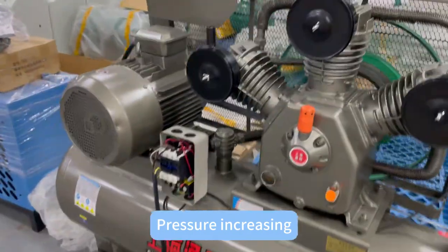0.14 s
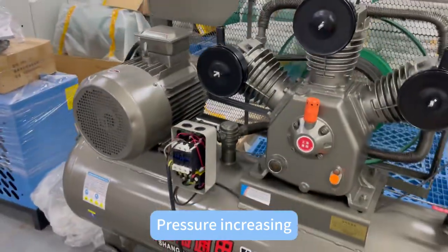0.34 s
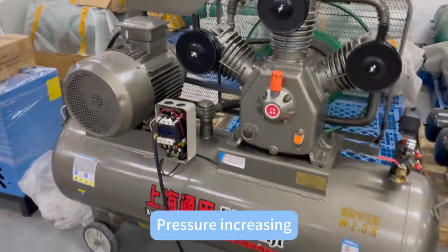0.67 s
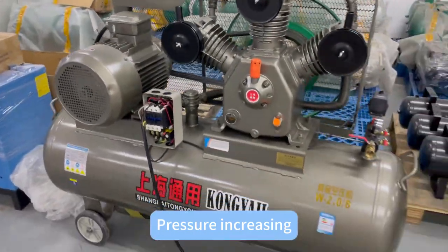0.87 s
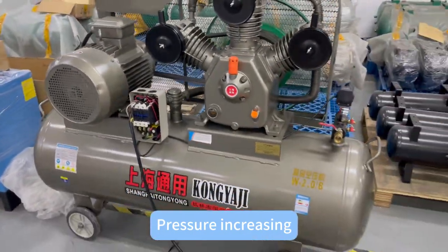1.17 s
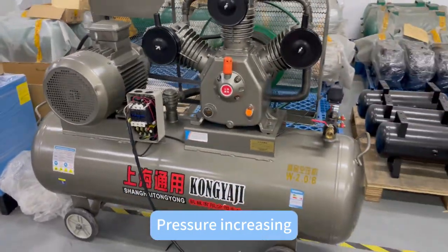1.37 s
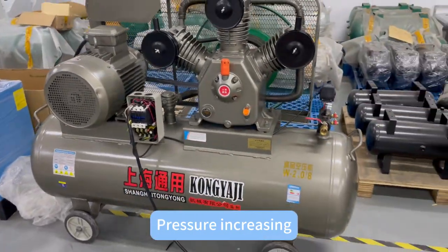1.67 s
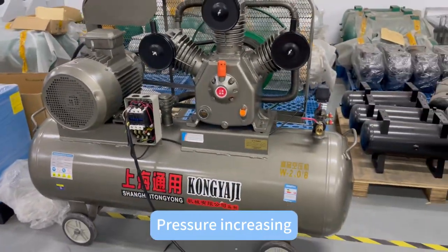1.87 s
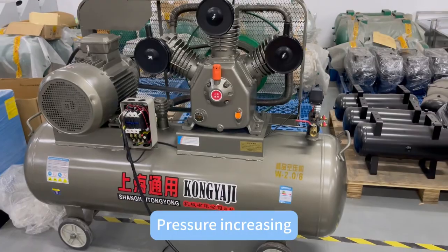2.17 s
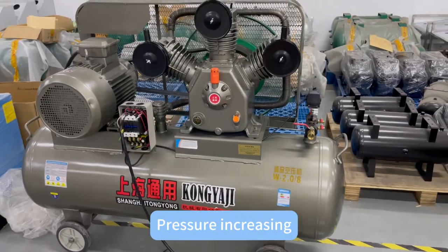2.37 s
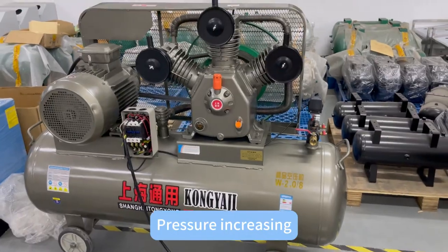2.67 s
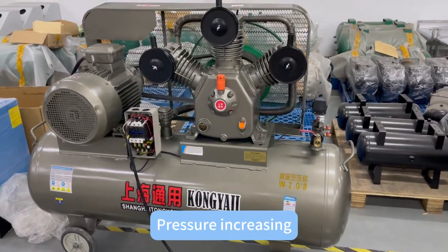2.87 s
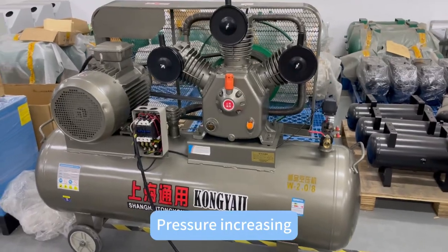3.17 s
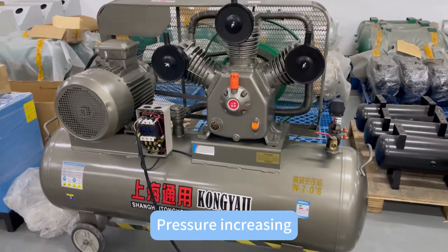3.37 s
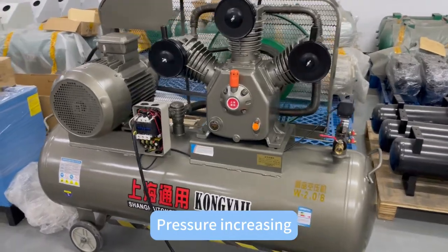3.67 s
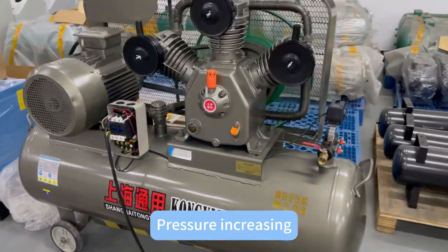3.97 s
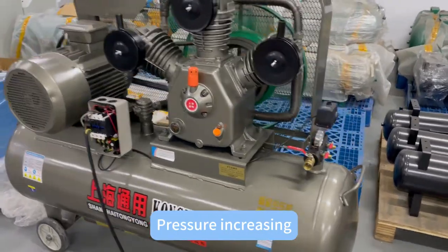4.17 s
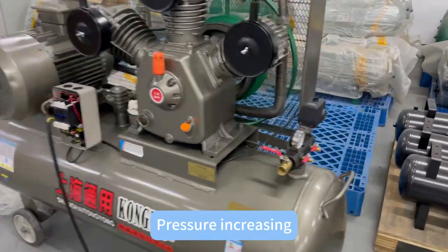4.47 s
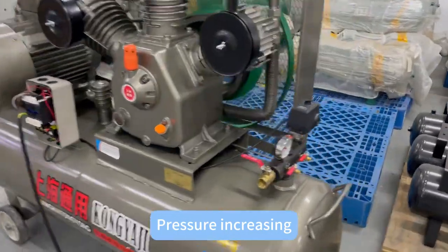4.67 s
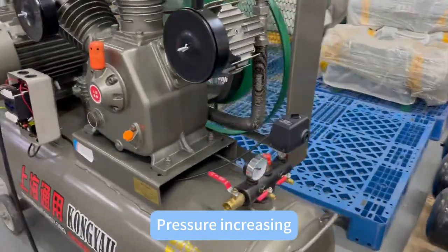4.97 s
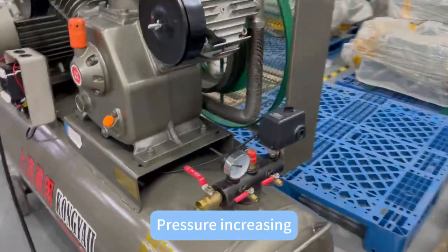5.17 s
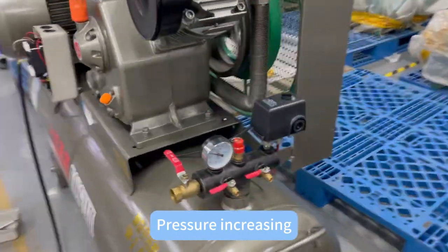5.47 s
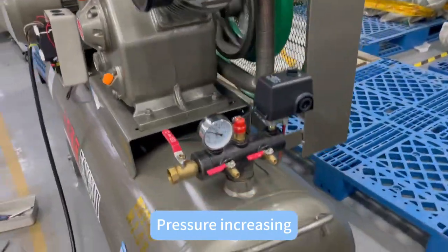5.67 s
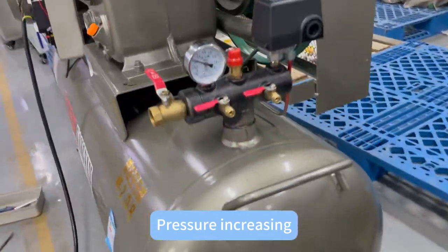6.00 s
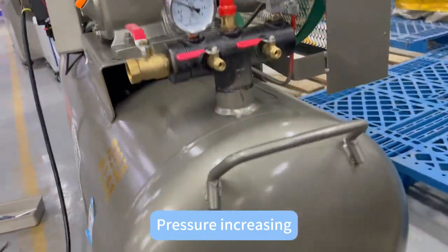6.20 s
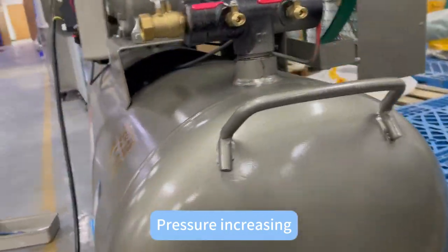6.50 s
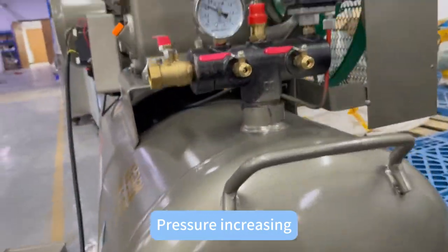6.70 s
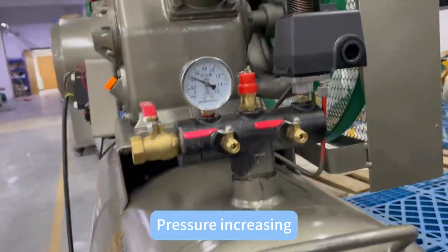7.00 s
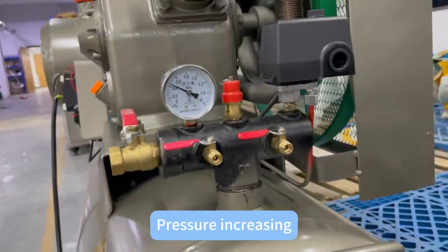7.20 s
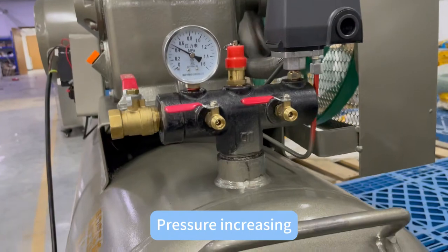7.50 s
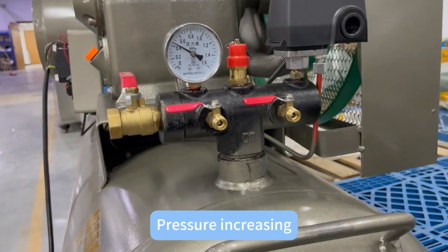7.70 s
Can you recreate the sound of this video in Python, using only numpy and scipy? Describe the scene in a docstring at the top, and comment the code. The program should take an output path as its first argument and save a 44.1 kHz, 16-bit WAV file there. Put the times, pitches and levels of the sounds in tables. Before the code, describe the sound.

A three-cylinder air compressor runs without pause in a warehouse, about thirteen low throbbing pulses a second, each turn repeating the same uneven pattern. Valve hiss puffs along, the metal frame rattles, thin whines waver and rumble lies beneath. A close stereo microphone backs off slightly, then walks round to the tank end; around four seconds low bursts of air and a soft thud hit it.

```python
"""A three-cylinder piston compressor pumps steadily in a warehouse, heard on a two-port microphone.
The listener backs off within a metre, then walks round from its front to its end.
Every crank turn repeats the same air pulses as decaying sines, the ringing of intakes, pipes and tank.
Valves puff as gated noise, the frame rattles as noise through resonances, a few sine whines come and go,
and low noise rumbles, as machine noise and as air moving on the microphone."""
import sys
import numpy as np
from scipy import signal
from scipy.fft import rfft, irfft, next_fast_len
from scipy.io import wavfile

SR = 44100
rng = np.random.default_rng(int(sys.argv[2]) if len(sys.argv) > 2 else 0)


def wav_out(sig):
    """Save sig, one row per channel (or a flat mono array), as 16-bit PCM at SR to the path in sys.argv[1]."""
    wavfile.write(sys.argv[1], SR, np.round(np.clip(np.atleast_2d(sig).T, -1, 1) * 32767).astype(np.int16))


N = 346185
RUN_IN = 12000  # samples played before the take and cut off, so that everything already sounds
TIME = np.arange(-RUN_IN, N) / SR  # s
CRANK_HZ = 12.85
SPEED_OF_SOUND = 343  # m/s


def from_db(db):
    """Decibels to amplitude gain."""
    return 10 ** (np.asarray(db) / 20)


def rms_one(x):
    """Scale to rms 1."""
    return x / np.sqrt(np.mean(x ** 2) + 1e-20)


def at_hz(points, hz):
    """Read a (hz, value) curve on a log-frequency axis."""
    points = np.array([p for p in points if p[0] > 0])
    return np.interp(np.log(hz + 1), np.log(points[:, 0]), points[:, 1])


def drift(rate):
    """Slow random wander: normal draws, two per 1 / rate seconds, joined by straight lines."""
    knots = np.arange(TIME[0], TIME[-1] + 1, .5 / rate)
    return np.interp(TIME, knots, rng.standard_normal(len(knots)))


# The listener's walk: time_s, path_m (extra sound path from the pump),
# bearing_deg (round the machine from its front)
WALK_ROUND = [(0, -0.17, -4), (1.201, 0.53, 10.5), (2.8, 0.67, 25.5), (3.9, 0.615, 28), (4.799, 0.17, 40),
              (6, 0.37, 68), (7.85, 0.39, 82.5)]


def walk():
    """Extra path in metres and bearing in degrees at every moment."""
    time_s, path_m, bearing_deg = np.transpose(WALK_ROUND)
    return np.interp(TIME, time_s, path_m), np.interp(TIME, time_s, bearing_deg)


def crank():
    """Crank angle in turns as it arrives at the microphone, delayed by the extra path."""
    path_m, _ = walk()
    return CRANK_HZ * (TIME - path_m / SPEED_OF_SOUND)


def heard(front_db, db_per_m, db_per_deg):
    """Gain of a running noise from where the listener stands: distance and bearing add decibels."""
    path_m, bearing_deg = walk()
    return from_db(front_db + db_per_m * path_m + db_per_deg * bearing_deg)


def ring(clicks, hz, t60_s):
    """A two-pole resonator: a unit click starts a decaying sine of height 1."""
    radius = from_db(-60 / (t60_s * SR))
    angle = 2 * np.pi * hz / SR
    poles = [1, -2 * radius * np.cos(angle), radius * radius]
    return signal.lfilter([0, np.sin(angle)], poles, clicks + 1e-18)


# Air pulses of one turn, each loudest in one direction: turn (crank angle 0-1), ring_hz, t60_s,
# push (+1) or pull (-1), level_db, db_per_m (change with distance), aim_deg (loudest bearing),
# width_deg (6 dB weaker this far aside)
AIR_PULSES = [(0.095, 140, 0.024, -1, 1, -18.5, 76, 30.5), (0.124, 250.4, 0.59, -1, -22, 10, 3, 48),
              (0.3, 354.5, 0.11, 1, -9.5, -22, 32.5, 26.5), (0.329, 395, 0.97, -1, -28, -5.5, 97, 145),
              (0.363, 338, 0.34, -1, -21, 11, -18, 53), (0.406, 313, 0.049, -1, -1, -14, 73.5, 35.5),
              (0.413, 273, 0.15, -1, -9.5, -10, 50.5, 35), (0.421, 173.5, 0.99, -1, -9, -9, 21, 39.5),
              (0.459, 121.6, 0.27, 1, -28, 14, 11, 49), (0.462, 84.8, 0.15, 1, -15, 10, 72, 28),
              (0.553, 452.5, 0.11, -1, -26.5, 9.5, -5, 132.0), (0.552, 651, 0.11, -1, -25, -3.5, 37, 30),
              (0.559, 269.7, 0.18, 1, -8.5, -21, 46, 38.5), (0.571, 297.6, 0.087, 1, -10.5, 8, 109, 66),
              (0.603, 64.5, 0.17, -1, -15.5, -3.5, 34, 76.0), (0.61, 716, 0.0089, -1, -16, -10.5, -3, 11),
              (0.628, 185.5, 0.069, 1, -5, -6.5, 63, 78), (0.695, 149, 0.25, -1, -17.5, 14.5, 17, 27),
              (0.703, 450, 0.066, -1, -16.5, 1, 95, 79), (0.738, 324, 0.082, 1, -18.5, -17, 0.0, 150.0),
              (0.757, 173, 0.067, -1, 0.5, -7.5, 45, 72), (0.857, 338, 0.15, -1, -12, -12, 102, 48),
              (0.916, 350, 0.062, -1, -18, 7, 1.5, 22), (0.939, 252.8, 0.084, 1, -15.5, 9, 54, 38),
              (0.941, 309.3, 0.39, 1, -17.5, -7.5, 13, 22), (0.21, 530, 0.27, 1, -32.5, -2.5, 19.5, 18),
              (0.481, 505.4, 0.078, 1, -29, 9.5, 48, 82), (0.832, 580, 0.13, -1, -33, -9, 86, 59),
              (0.36, 630, 0.29, 1, -22.5, 2, 100, 22), (0.05, 414.5, 0.068, 1, -19.5, -3.5, 49, 68),
              (0.599, 380, 0.12, -1, -24.5, -9, 64, 38), (0.5, 38.6, 0.41, 1, -23, 2, 78, 32)]


def pump(turns, scatter_db=.4):
    """Each air pulse recurs once a turn; its strength follows distance and bearing and varies a little."""
    path_m, bearing_deg = walk()
    pulses = 0
    for turn, ring_hz, t60_s, push, level_db, db_per_m, aim_deg, width_deg in AIR_PULSES:
        due = np.diff(np.floor(turns - turn), prepend=np.floor(turns[0] - turn)) > 0
        chance = rng.standard_normal(due.sum())
        aside_db = 6 * ((bearing_deg[due] - aim_deg) / width_deg) ** 2
        strength_db = level_db + db_per_m * path_m[due] - aside_db + scatter_db * chance
        clicks = np.zeros(len(TIME))
        clicks[due] = from_db(strength_db)
        pulses = pulses + ring(np.sign(push) * clicks, ring_hz, t60_s)
    # soft air without the deepest bass
    for order, band_hz in [(2, [30, 1100]), (4, [50, 2500])]:
        pulses = signal.sosfilt(signal.butter(order, band_hz, "band", fs=SR, output="sos"), pulses)
    # the ports hear the pulses a moment apart: the slope, at -17 dB for 300 Hz, is the difference
    side = from_db(-17.0) * np.gradient(pulses) * SR / (2 * np.pi * 300)
    return np.array([pulses + side, pulses - side])


# How alike the two ports hear a noise: hz, likeness (0-1)
PORT_LIKENESS = [(100, 0.88), (350, 0.91), (800, 0.54), (1800, 0.42), (4000, 0.68), (6000, 0.66), (8200, 1),
                 (11000, 0.47), (14600, 0.91)]
# Balance of the ports: hz, left_minus_right_db
PORT_BALANCE = [(60, 0), (290, -0.5), (640, 3.5), (1410, 1.5), (3100, 2.0), (6820, 0.5), (15000, -0.5)]
# Phase between the ports: hz, left_lead_rad
PORT_LEAD = [(0, 0), (900, .6), (2000, 0), (2700, .5), (5300, .5), (6800, -1.1), (8200, -3.14),
             (10500, -5.9), (12300, -6.5), (14600, -9.4), (16000, -9.6)]


def to_ports(shared, own, spectrum):
    """Colour a sound and give it to the two ports, partly alike, with their phase and balance."""
    size = next_fast_len(len(TIME))
    hz = np.arange(size // 2 + 1) * SR / size
    alike = np.clip(at_hz(PORT_LIKENESS, hz), 0, 1)
    side = np.array([[.5], [-.5]])  # left, right
    balance = from_db(side * at_hz(PORT_BALANCE, hz))
    lead = np.exp(1j * side * np.interp(hz, *np.transpose(PORT_LEAD)))
    mix = np.sqrt(alike) * rfft(shared, size) + np.sqrt(1 - alike) * rfft(own, size)
    coloured = mix * balance * lead * from_db(at_hz(spectrum, hz))
    return irfft(coloured, size)[:, :len(TIME)]


def noise(gate, spectrum, looped=0):
    """Gated, coloured two-port noise of rms 1; a looped part may join it."""
    white = (rng.standard_normal((3, len(TIME))) + looped) * gate
    return rms_one(to_ports(white[0], white[1:], spectrum))


# Valve puffs of one turn: turn (crank angle 0-1), fade_turns, lift_db (before the hiss is levelled)
VALVE_PUFFS = [(.12, 0.07, 4), (.28, 0.1, 9.5), (.44, 0.12, 6), (.68, 0.26, -1.5)]


def valves(turns, scatter_db, shut_db):
    """Noise gate: each valve opens fast and its flow fades, never twice alike, over a steady leak."""
    gate = from_db(shut_db)
    for turn, fade_turns, lift_db in VALVE_PUFFS:
        since = (turns - turn) % 1
        opening = np.minimum(since / .04, 1)
        lift = from_db(lift_db + scatter_db * drift(12))
        gate = gate + lift * opening * np.exp(-since / fade_turns)
    return gate


# Colour of the valve hiss: hz, level_db (relative density)
HISS_COLOUR = [(3500, -26), (5000, -4.5), (6500, -3.5), (8000, -1.5), (9000, -2.5), (10000, -4),
               (10700, -5.5), (12200, -9), (14000, -8), (15500, -3.5), (17000, -3.5)]


def valve_hiss(turns):
    """Air through the valves: high noise that puffs with the crank, weaker with distance."""
    puffing = noise(valves(turns, scatter_db=1.5, shut_db=2.5), HISS_COLOUR)
    return heard(front_db=-36.5, db_per_m=-4, db_per_deg=0.065) * puffing


# Resonances of guard, fins and pipes, knocked once a turn: ring_hz, width_hz, lift_db (relative),
# aim_deg (loudest bearing), turn (crank angle 0-1 of the knock), knock_db, fade_turns
FRAME_PARTS = [(722, 59, -5, 87, 0.2, 10, .1), (1100, 90, -5, 22, 0.3, 8, 0.13),
               (1507, 35, -1.5, 103, .42, 4, .12), (1530, 45, -4, 82, .86, 7, .12),
               (1612, 28, -4, 20, .69, 4, 0.072), (1748, 24, -0.5, 92, .6, 2, .1),
               (2117, 113, 0, 75, .88, 4, .2), (2286, 88, -1, 48, 0.7, 2, .2),
               (2464, 67, 0, 62, .62, 3, .15), (2643, 61, 0.5, 33, .54, 5.5, 0.14),
               (2910, 63, -5.5, 81, .56, 5, .2), (3267, 120, -5.5, 17, .55, 8, 0.07),
               (3690, 117, -1.5, 60, .43, 5, 0.35), (4067, 140, -2, 73, .44, 6, .3),
               (4420, 35, -5, 35, .5, 1, .2)]
# Colour of the rattle: hz, level_db (relative density)
RATTLE_COLOUR = [(350, -56), (520, -4), (650, -7), (800, -3), (1000, -7.5), (1300, -9.5), (2000, -13),
                 (2700, -16.5), (3000, -17), (4200, -22.5), (5500, -24.5), (7200, -28.5), (10000, -95)]
SHAKE_SWELL_DB, SHAKE_PEAK_TURN = 1.3, .68  # the shaking swells once a turn
FRAME_BEAM_DEG = 47.5  # a part is 6 dB weaker this far aside


def frame_rattle(turns, repeat_db=-10, flicker_db=2.5, grain_db=1.3):
    """Contacts shake the frame, some again at the same crank angle; each part rings when knocked."""
    steps = round(SR / CRANK_HZ)
    contacts = rng.standard_normal((3, steps))
    looped = from_db(repeat_db) * contacts[:, (turns % 1 * steps).astype(int)]
    swell_db = SHAKE_SWELL_DB * np.cos(2 * np.pi * (turns - SHAKE_PEAK_TURN))
    gate = from_db(grain_db * drift(400) + swell_db)
    shake = noise(gate, [(100, 0), (10000, 0)], looped)
    rung = shake.copy()
    _, bearing_deg = walk()
    for ring_hz, width_hz, lift_db, aim_deg, turn, knock_db, fade_turns in FRAME_PARTS:
        knocked_db = knock_db * np.exp(-((turns - turn) % 1) / fade_turns)
        aside_db = 6 * ((bearing_deg - aim_deg) / FRAME_BEAM_DEG) ** 2
        bursts = shake * from_db(lift_db + knocked_db - aside_db + flicker_db * drift(25))
        # a band-pass resonator of about unit gain at its centre
        radius = np.exp(-np.pi * width_hz / SR)
        poles = [1, -2 * radius * np.cos(2 * np.pi * ring_hz / SR), radius * radius]
        zeros = [(1 - radius * radius) / 2, 0, (radius * radius - 1) / 2]
        rung += signal.lfilter(zeros, poles, bursts)
    size = next_fast_len(len(TIME))
    colour = from_db(at_hz(RATTLE_COLOUR, np.arange(size // 2 + 1) * SR / size))
    return rms_one(irfft(rfft(rung, size) * colour, size)[:, :len(TIME)])


# Whines: pitch_hz, start_s, end_s, level_db (before swell and port balance), swell_db (once a turn),
# turn (loudest crank angle 0-1), throb_db (depth of the slow throb)
WHINE_TONES = [(844, -1, 4.3, -42.5, 8, 0.85, -0.5), (829, 4.5, 6.3, -39.5, 8.5, 0.76, 0.5),
               (823.6, 6.1, 9, -48, 6, 0.7, -1), (1080, 1.1, 4.03, -46, 4, .4, 7),
               (1142, .95, 1.3, -38.5, 0, .38, -3), (1142, 1.7, 2.3, -45, 5, .38, 0),
               (1142, 3, 3.48, -38.5, 2.5, .38, 0.5), (1150, 3.7, 4.15, -43, 3, 0.3, -2),
               (1143, 6.1, 7.0, -43.5, 4, 0.3, 2), (738, 6.5, 9, -46.5, 4, 0.3, -1),
               (1300, 6.1, 6.5, -42, 4, 0.61, 0), (491, -1, .9, -38, 3, .42, 0),
               (1505, 6.5, 9, -46, 3, .45, 0), (774, -1.5, 4.27, -48, 4, 0.3, -2),
               (953, 1, 4.6, -48, 3, 0.6, 0), (2132, 6.5, 9, -54, 3, 0.8, 0)]
WHINE_FADE_S = .15
THROB_HZ, THROB_PEAK_S = 3.05, 1.98  # a slow throb
WAVER_SHARE, WHINE_FLICKER_DB = .0012, 2  # pitch wanders by this share of itself


def whines(turns):
    """Thin sine tones that waver, swell once a crank turn and are each heard for a while."""
    out = np.zeros(len(TIME))
    throb = np.cos(2 * np.pi * THROB_HZ * (TIME - THROB_PEAK_S))
    for pitch_hz, start_s, end_s, level_db, swell_db, turn, throb_db in WHINE_TONES:
        on = slice(*np.searchsorted(TIME, [start_s, end_s]))
        wavering_hz = pitch_hz * (1 + WAVER_SHARE * drift(20)[on])
        tone = np.sqrt(2) * np.sin(2 * np.pi * np.cumsum(wavering_hz) / SR)
        fade = np.clip(np.minimum(TIME[on] - start_s, end_s - TIME[on]) / WHINE_FADE_S, 0, 1)
        stroke_db = swell_db * np.cos(2 * np.pi * (turns[on] - turn)) + throb_db * throb[on]
        flicker_db = WHINE_FLICKER_DB * drift(4)[on]
        out[on] += from_db(level_db + stroke_db + flicker_db) * fade * tone
    return out * from_db([[1.5], [-1.5]])  # left, right


# Colour of the low running noise: hz, level_db (relative density)
RUMBLE_COLOUR = [(80, -38), (150, -8), (250, -1), (330, -5), (400, -8), (480, -12), (620, -27), (900, -38),
                 (2000, -90)]


def machine_rumble():
    """Low running noise of the machine, its level wandering and growing towards the end."""
    running = noise(from_db(1.9 * drift(13)), RUMBLE_COLOUR)
    return heard(front_db=-29, db_per_m=1, db_per_deg=0.052) * running


# Level of moving air on the microphone: time_s, level_db
AIR_LEVEL = [(0, -27), (.6, -28.5), (2.2, -35), (3.4, -31.5), (4.3, -24.5), (4.7, -29), (5.8, -33),
             (6.4, -39), (7.85, -30)]
# Colour of the moving air: hz, level_db (relative density)
WIND_COLOUR = [(20, -14), (38, -9), (60, 5), (100, 3), (160, -6.5), (250, -7), (400, -45), (800, -90)]


def moving_air():
    """Air moving over the microphone: deep unsteady noise that follows a level curve."""
    unsteady = from_db(2.5 * drift(10) + 1.9 * drift(3))
    level_db = np.interp(TIME, *np.transpose(AIR_LEVEL))
    return from_db(level_db) * noise(unsteady, WIND_COLOUR)


# Bursts of air on the microphone: start_s, fade_s (time scale), level_db (gate, nominal)
AIR_GUSTS = [(3.8, 0.023, -23), (3.95, 0.032, -21), (4.11, 0.024, -28), (4.24, 0.043, -22),
             (4.62, 0.024, -35)]
# Colour of the bursts: hz, level_db (relative density)
BURST_COLOUR = [(25, -25), (45, -7), (80, 2), (130, 0), (220, -7), (700, -14), (1200, -52)]


def gust():
    """Rough low bursts of air: noise through gates quick to come and to fade."""
    gate = 0
    for start_s, fade_s, level_db in AIR_GUSTS:
        since = np.maximum(TIME - start_s, 0) / fade_s
        gate = gate + from_db(level_db) * 3 * since * np.exp(1 - 3 * since) ** .5
    return gate * noise(1, BURST_COLOUR)


# Compact thuds on the microphone: start_s, level_db, from_hz, to_hz
AIR_THUDS = [(4.292, -7, 260, 60), (4.402, -19, 140, 70)]
THUD_SWELL_S, THUD_SINK_S = .012, .015


def thud():
    """Short pushes of air on the microphone: swelling and fading sines that sink in pitch."""
    out = 0
    for start_s, level_db, from_hz, to_hz in AIR_THUDS:
        since = np.clip(TIME - start_s, 0, 1)
        hz = to_hz + (from_hz - to_hz) * np.exp(-since / THUD_SINK_S)
        swell = since / THUD_SWELL_S * np.exp(1 - since / THUD_SWELL_S)
        phase = 2 * np.pi * np.cumsum(hz * (since > 0)) / SR
        out = out + from_db(level_db) * swell * np.sin(phase)
    return out


def scene():
    """Pump, hiss, rattle, whines, rumble and moving air together, without the run-in."""
    turns = crank()
    rattle = heard(front_db=-27.5, db_per_m=-2.34, db_per_deg=0.035) * frame_rattle(turns)
    machine = pump(turns) + valve_hiss(turns) + rattle + whines(turns) + machine_rumble()
    air = moving_air() + gust() + thud()
    return (machine + air)[:, RUN_IN:]


def record(dry):
    """The microphone loses the deepest bass; the top is cut steeply at 15.72 kHz."""
    dry = signal.sosfilt(signal.butter(3, 30, "high", fs=SR, output="sos"), dry)
    return signal.sosfilt(signal.ellip(12, .5, 75, 15720, fs=SR, output="sos"), dry)


dry = scene()
out = record(dry)
wav_out(out)
```